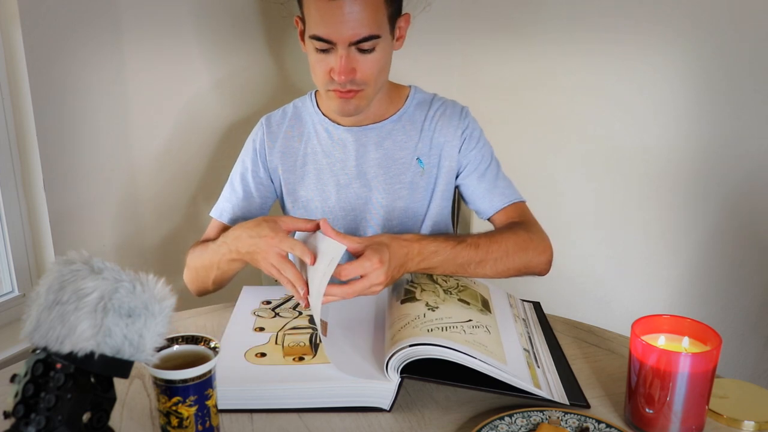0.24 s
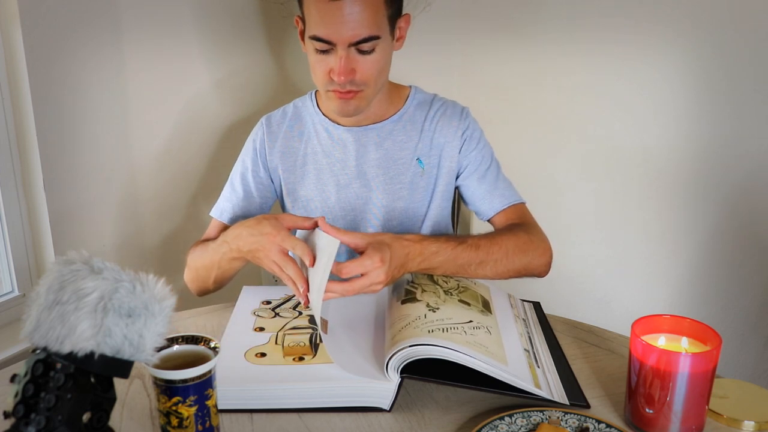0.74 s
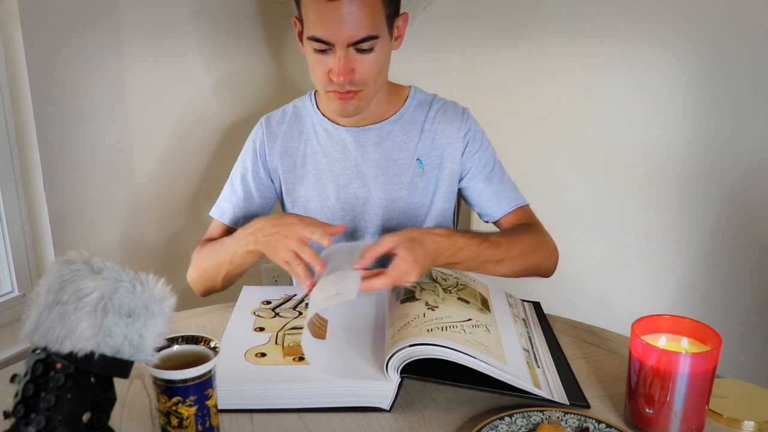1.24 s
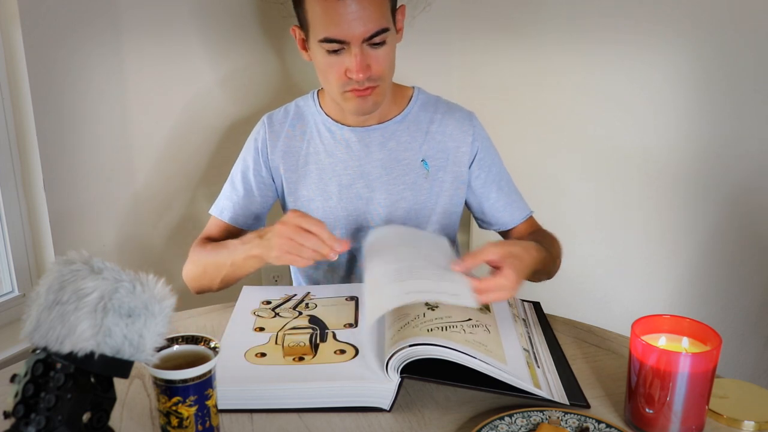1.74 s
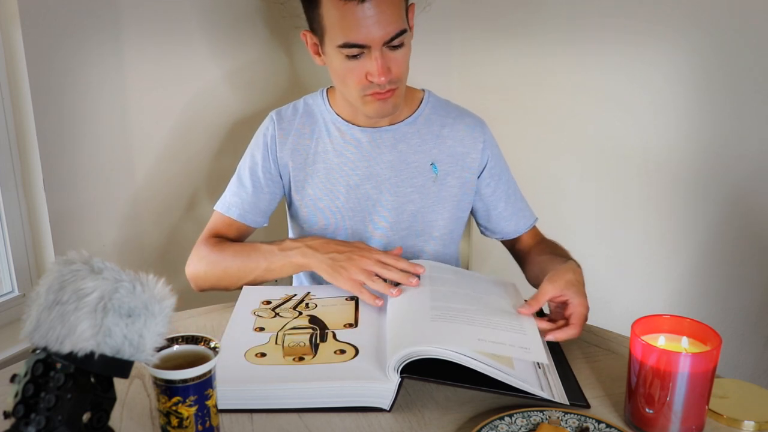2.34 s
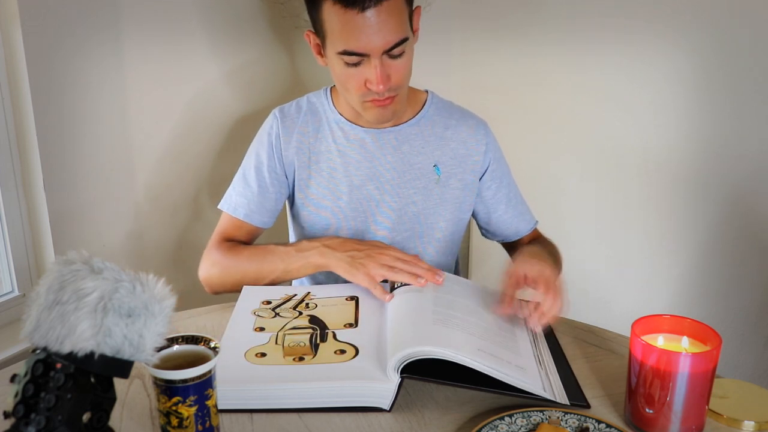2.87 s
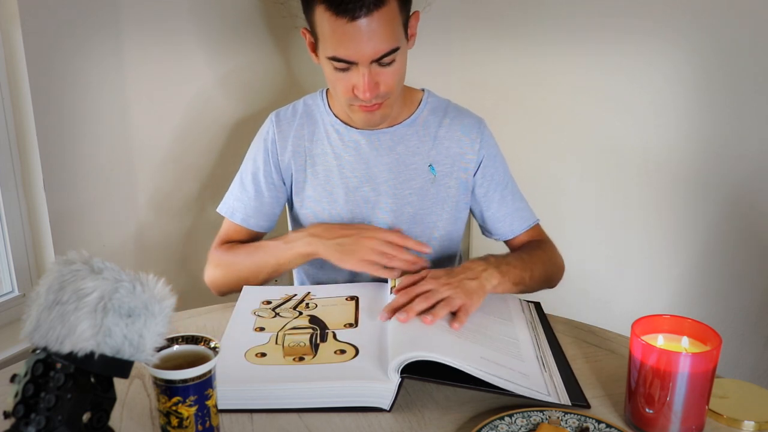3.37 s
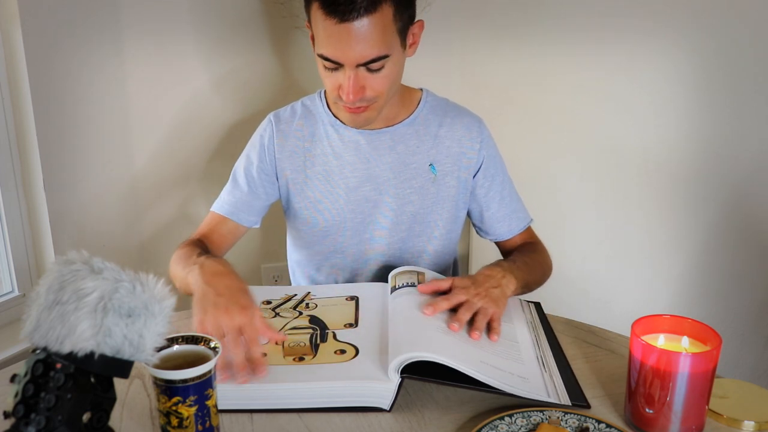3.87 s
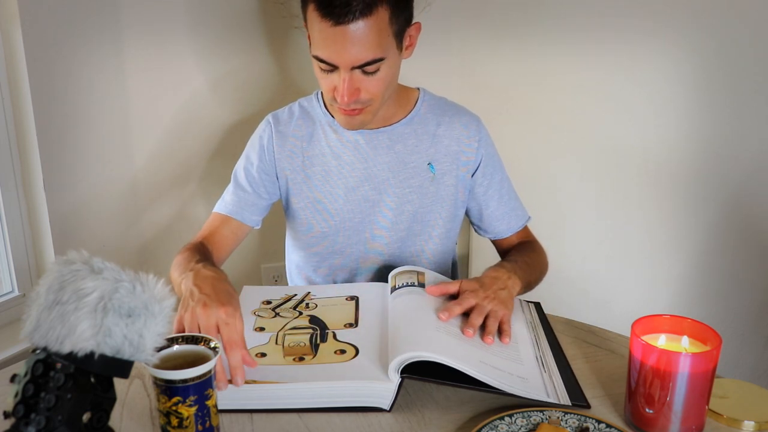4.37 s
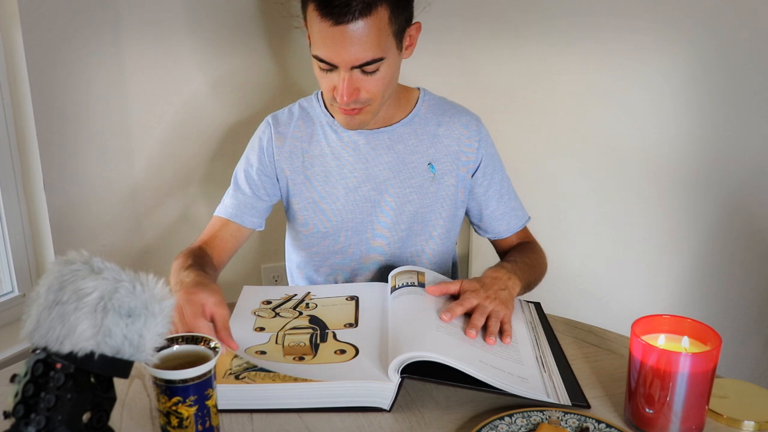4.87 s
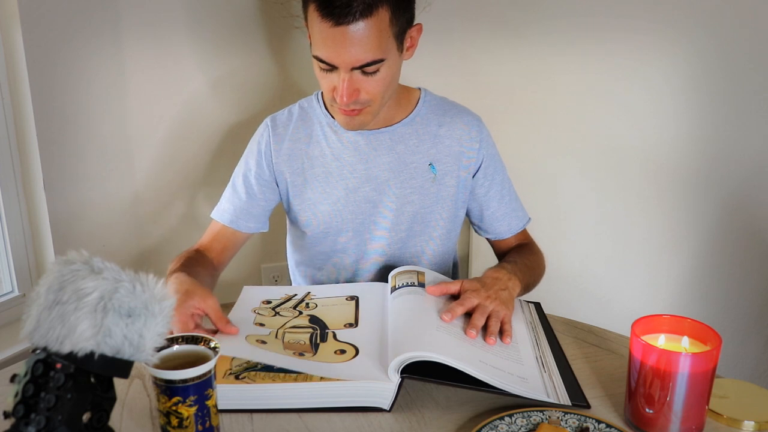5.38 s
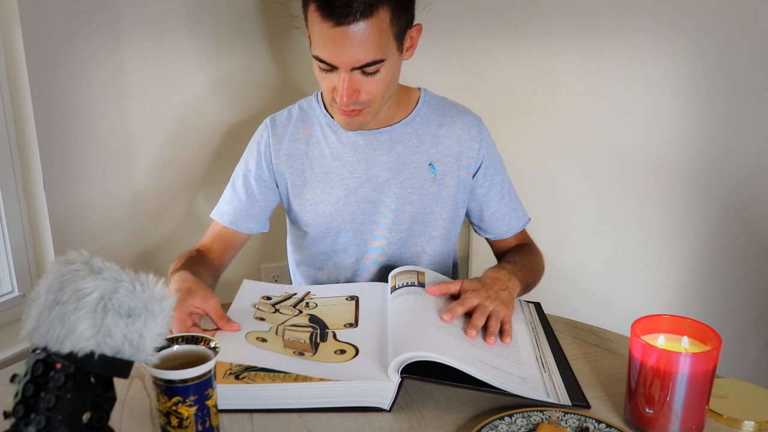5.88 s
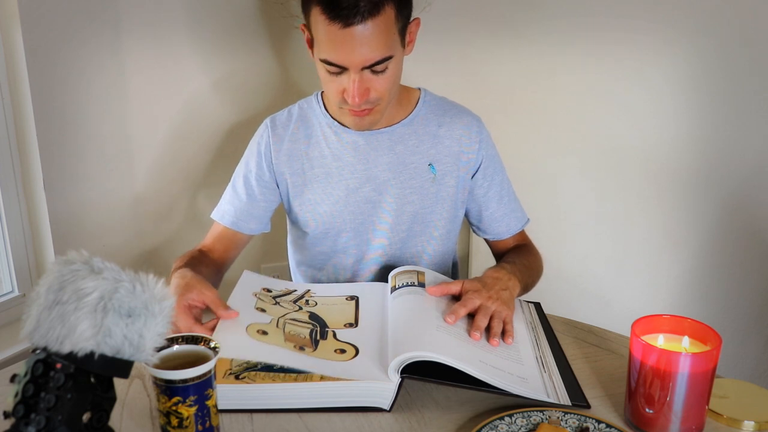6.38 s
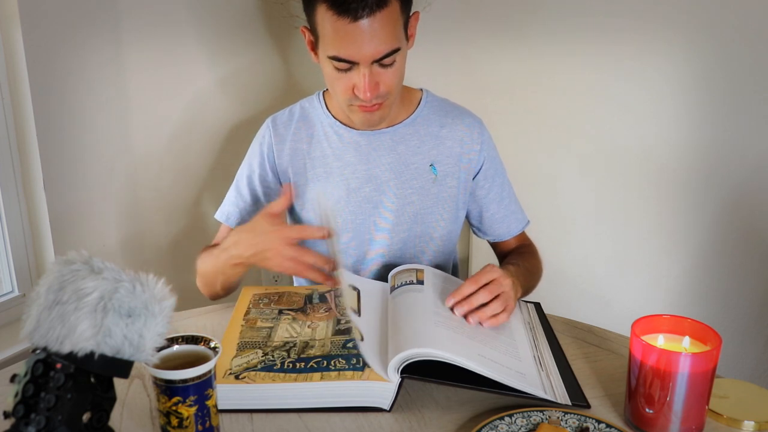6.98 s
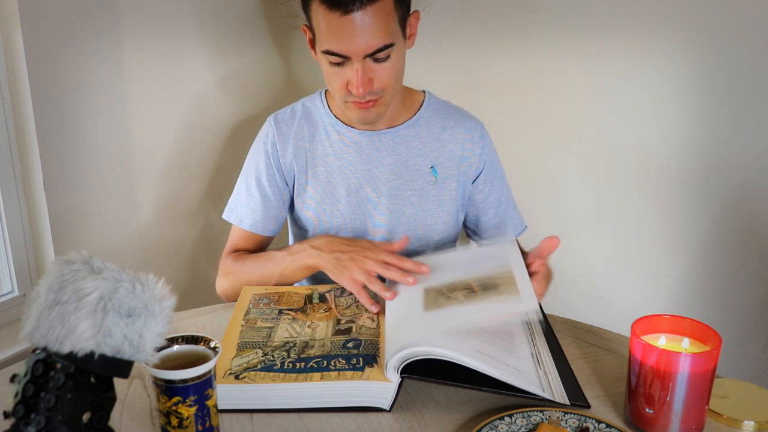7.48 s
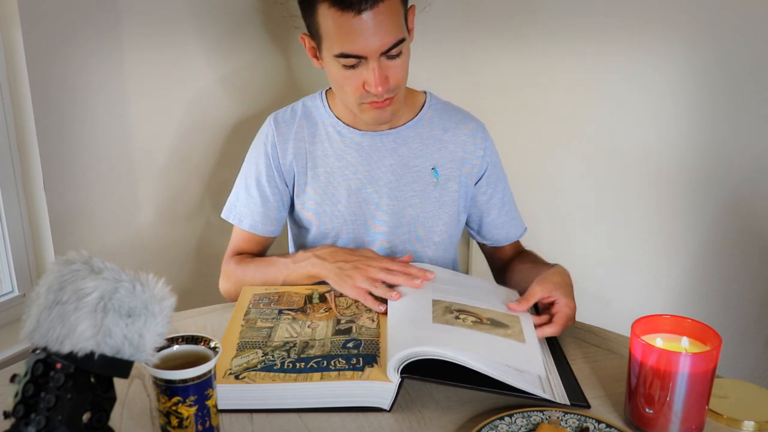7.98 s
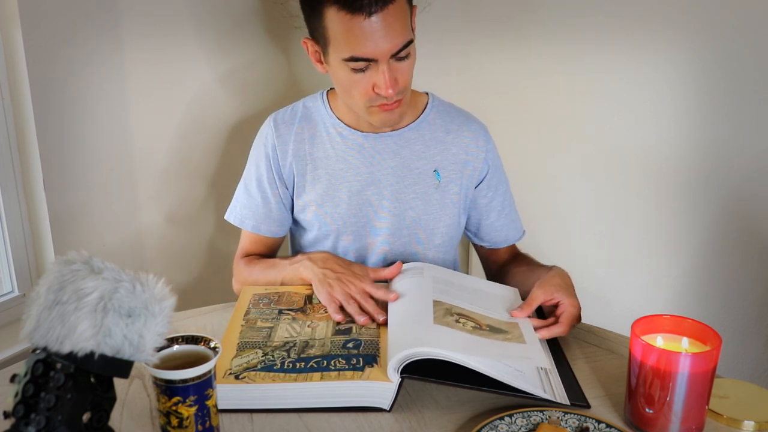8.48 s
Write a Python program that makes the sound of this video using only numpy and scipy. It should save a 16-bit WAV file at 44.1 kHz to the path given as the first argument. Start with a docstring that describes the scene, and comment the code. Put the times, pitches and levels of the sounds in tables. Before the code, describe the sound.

Close stereo sound of a large book with thick pages, handled at a wooden table in a quiet, fairly dry room with faint hiss. It opens with a sheet flexing and rustling; tiny ticks come around 0.4 s, a hard loud snap at 0.65 s and a weaker snap with a low papery puff at 1.1 s. The page turns over with hollow, airy rustling until about 2.4 s. From 2.7 to 4.3 s hands smooth the paper in soft bright hisses, with dull low table bumps, notably at 3.2 and 3.7 s. A sharp click with a short slap lands at 4.67 s, then silky sliding. Between 5.8 and 6.3 s a corner crackles in about eight dry clicks over a low table tremor. Another page sweeps over around 7 s, flops softly at 7.6 s, and light smoothing and low thumps, strongest near 8.4 s, finish at 8.7 s.

```python
"""Thick pages of a large book are lifted, turned and smoothed by hand on a wooden table, near a stereo microphone.
Filtered grainy noise makes the sheets flex and slide, the air wedge sing and the skin hiss, stroke by stroke.
Hands ring decaying table modes over a tremor of varying level. Corners snap with a crack, kick, pop and short
bright hiss; sheets slap as band-limited puffs. Weak echoes, a decaying diffuse part unlike in left and right,
and a quiet floor hiss surround them."""
import sys
import numpy as np
from scipy import signal
from scipy.fft import rfft, irfft, next_fast_len
from scipy.io import wavfile
from scipy.ndimage import uniform_filter1d, map_coordinates

SR = 44100
rng = np.random.default_rng(int(sys.argv[2]) if len(sys.argv) > 2 else 0)


def wav_out(sig):
    """Save sig, one row per channel (or a flat mono array), as 16-bit PCM at SR to the path in sys.argv[1]."""
    wavfile.write(sys.argv[1], SR, np.round(np.clip(np.atleast_2d(sig).T, -1, 1) * 32767).astype(np.int16))


N = 384552

# Every pan_db is left minus right.
# hand strokes: peak_s, rise_s, fall_s, flex_db, slide_db, skin_db, slide_centre_hz
STROKES = [(0.069, 0.67, 0.13, -45.5, -45.5, -57.5, 2330), (.364, 0.076, 0.041, -62.5, -59.5, -86, 2000),
           (.5, 0.02, 0.11, -56, -57.5, -80, 2200), (.6, 0.11, 0.056, -56, -58, -68, 1850),
           (.70, 0.057, 0.14, -49, -54.5, -67, 1750), (.84, 0.072, .08, -54.5, -54.5, -65, 2000),
           (.956, 0.13, 0.052, -48, -49, -60.5, 2430), (1.075, 0.021, 0.094, -54, -45.5, -52.5, 1930),
           (1.144, 0.1, 0.094, -46.5, -45, -56, 2300), (1.32, 0.14, 0.25, -56.5, -53, -53.5, 2740),
           (1.5, 0.24, 0.77, -57, -52, -55.5, 2050), (1.74, 0.24, 0.24, -59.5, -65, -57, 2200),
           (1.91, 0.27, 0.17, -55.5, -64, -53, 2320), (2.24, 0.33, 0.19, -58.5, -60, -55, 3090),
           (2.55, 0.85, 0.44, -76, -66, -60, 2600), (3.03, 0.44, 0.3, -74, -65.5, -55.5, 2940),
           (3.21, 0.17, 0.45, -87, -66, -52, 4200), (3.47, 0.048, 0.16, -71, -66, -69, 3600),
           (3.77, 0.44, 0.42, -74, -60.5, -47, 3950), (3.99, .25, 0.22, -71.5, -60, -50, 4430),
           (4.16, 0.18, 0.15, -74, -69.5, -57.5, 4000), (4.34, 0.071, 0.089, -73, -72, -64, 3000),
           (4.58, 0.086, 0.16, -78, -70, -59.5, 4500), (4.745, 0.14, 0.11, -64, -53, -56.5, 4200),
           (4.815, 0.077, 0.14, -59.5, -48, -53, 3880), (5.1, 0.37, 0.6, -66.5, -51.5, -52.5, 3970),
           (5.27, 0.31, 0.36, -74, -50.5, -46, 3870), (5.5, 0.27, 0.13, -71, -52, -51, 3780),
           (5.76, 0.35, 0.088, -68, -56.5, -61, 2980), (6.34, 0.093, 0.25, -57.5, -51.5, -60, 2400),
           (6.45, 0.067, 0.053, -72, -60, -69, 3200), (6.58, 0.1, 0.22, -68, -56.5, -65, 3700),
           (6.87, 0.53, 0.37, -62.5, -58.5, -52, 2460), (7.15, 0.24, 0.24, -61, -59.5, -52, 2200),
           (7.42, 0.7, 0.21, -67.5, -57, -51, 3120), (7.66, 0.069, 0.15, -55, -61, -56.5, 1600),
           (7.78, .1, .06, -60, -75, -58, 1600), (7.9, 0.046, .06, -61.5, -66.5, -66, 2280),
           (8.0, 0.065, 0.17, -68.5, -72, -62, 2400), (8.17, 0.33, 0.34, -68.5, -62.5, -53, 2560),
           (8.34, .12, 0.17, -65.5, -57.5, -48, 3300), (8.44, 0.13, 0.13, -67.5, -61.5, -52.5, 3380),
           (8.64, 0.14, 0.57, -69.5, -61, -54, 3270)]
# the hands: start_s, pan_db, base_hiss_tilt_db_per_octave
HAND_PATH = [(0, -2, 1.5), (.5, -2, -3), (1.07, -1.5, 2), (1.45, -2, -4), (1.9, -1.5, -4.5),
             (2.1, -2, -8.5), (2.5, -1, -2.5), (2.9, -2.5, -1.5), (3.3, -2.5, 2), (4, -2, 2), (4.3, -2, 0),
             (4.46, -1, -4), (4.58, -1, -2), (4.72, -3, -10), (4.85, -1, 1), (5.2, -.5, 4.5), (5.6, .3, 0),
             (6.2, .3, -3), (6.75, .5, 4.5), (7.1, -2, -0.5), (7.5, -2.5, -0.5), (7.8, -2.5, -6),
             (8.28, -2, 2), (8.72, -2.5, 2)]
# air wedge under a lifted sheet: start_s, pitch_hz, level_db
AIR_WEDGE = [(0, 925, -50.5), (.12, 950, -52), (.25, 900, -72), (1.25, 795, -59), (1.4, 766, -70),
             (1.45, 764, -52.5), (1.65, 770, -55.5), (1.8, 814, -51.5), (2.0, 789, -63.5), (2.3, 1240, -68),
             (2.42, 1610, -69), (2.65, 1570, -71), (2.8, 1630, -81), (4.6, 1310, -86), (4.75, 1190, -66),
             (5.05, 2180, -80), (5.55, 1650, -60.5), (6.0, 1500, -79), (6.35, 1500, -64),
             (6.75, 1260, -69.5), (7.15, 1920, -61.5), (7.9, 1490, -73), (8.15, 1680, -66.5),
             (8.72, 1560, -79)]
# sheet flexing modes: centre_hz, width_hz, relative_db
FLEX_MODES = [(183.4, 57, -2.5), (262.3, 62, -4), (419, 43, -4.5), (598, 39, -2), (718, 188, -2.5),
              (827, 130, 1.5), (1070, 146, -4), (1305, 154, 0.5), (1697, 376, -5.5)]
# paper sliding modes: centre_hz, width_hz, relative_db
SLIDE_MODES = [(1405, 650, -18), (2040, 570, 2.5), (2890, 620, 2), (3945, 960, 3), (5340, 760, -3)]
# skin hiss spectrum, also used for the snaps' hiss: freq_hz, relative_density_db
SKIN_SPECTRUM = [(1500, -45), (3500, -4.5), (5500, -3.5), (7800, 0), (10000, -2.5), (12500, -5),
                 (15800, -9)]
# table tremor: start_s, level_db
TREMOR = [(0, -46), (.2, -70), (1.9, -70.5), (2.3, -60.5), (3.2, -66), (3.74, -55), (4.03, -64.5),
          (4.6, -55.5), (5.0, -61), (5.68, -65), (5.9, -45), (6.3, -39), (6.5, -50.5), (7.04, -59.5),
          (7.7, -53), (8.72, -59.5)]
# hands pushing the table: start_s, low_modes_db, upper_modes_db, rise_s, pan_db
THUMPS = [(0.076, -44, -55, .01, 7.5), (0.932, -45.5, -45, .019, 9.5), (1.089, -37, -52, 0.01, 7),
          (2.195, -51, -65, .03, -17), (2.736, -43, -38, 0.018, -12), (3.11, -59, -40, .02, -8),
          (3.179, -29.5, -41, 0.044, -13), (3.539, -44.5, -60, 0.041, -15), (3.694, -34, -30, 0.044, -23),
          (4.163, -49.5, -47, .02, -10), (4.332, -42, -44, 0.016, -11), (4.645, -47, -38, .02, -2),
          (5.406, -44, -66, 0.022, 8), (5.582, -58, -48, 0.023, 2), (6.029, -58, -33, 0.018, -6),
          (6.389, -38, -63, 0.013, -6), (6.704, -41.5, -47, 0.0095, -6.5), (6.984, -49, -60, .02, -1),
          (7.24, -47, -43.5, .014, -4), (7.602, -39, -35, 0.017, 7), (7.72, -36.5, -37, 0.021, -12),
          (8.078, -42, -64, 0.016, 5.5), (8.189, -46, -62, .017, 6), (8.315, -36, -36.5, .019, -5),
          (8.38, -28, -40, 0.026, -13), (8.528, -34.5, -47, 0.01, -8.5)]
# table modes: nominal_hz, relative_db, t60_s
TABLE_MODES = [(35, -0.5, 0.26), (62.6, 7, 0.26), (115.7, 0.5, 0.26), (165, -10.5, 0.13)]
# room air and microphone hiss spectrum: freq_hz, relative_density_db
FLOOR_SPECTRUM = [(15, -10.5), (25, 3.5), (86, -21.5), (414, -25), (812, -31), (955, -35), (1040, -30.5),
                  (1150, -32), (1280, -34.5), (15800, -47)]
# corners snapping free: start_s, level_db, upper_crack_relative_db, pop_relative_db, hiss_relative_db, pan_db
SNAPS = [(0.3672, -50, -20, 2.5, -28, -2), (0.4345, -48.5, -35, -7, -29, -5), (0.488, -53, -21, 1, -32, -4),
         (0.6453, -18, -12, -5, -21.5, -7), (1.053, -41.5, -19, 5.5, -22, -1.5),
         (1.1033, -24.5, -8, 0, -8.5, -1), (4.5515, -50.5, -22, 1, -14, -1),
         (4.6696, -32, 8, -5.5, -18, -2.5), (5.8282, -40, -5, -5, -0.5, 2.5),
         (5.898, -30.5, -10, -11.5, -8.5, 1), (5.9745, -31.5, -8, -9, -9, 0),
         (6.096, -31.5, -12, -4, -6, 0), (6.1585, -30, -13, -14, -10, 2),
         (6.2046, -30.5, -13, -11.5, -8, 1), (6.2659, -27.5, -16, -13.5, -11.5, 1),
         (6.307, -31.5, -12, -7.5, -11, 3), (7.6238, -43, -15, 13, 1, -5)]
# stiff page edge modes: centre_hz, width_hz, relative_db
EDGE_MODES = [(700, 220, -1), (1680, 235, 5.5), (3630, 1060, 12.5), (4580, 750, 5), (8360, 1900, -24)]
# sheets slapping, buckling or brushing: start_s, level_db, low_corner_hz, high_corner_hz, rise_s, t60_s, pan_db
SLAPS = [(0.647, -29, 500, 1980, 0.0023, 0.049, 13), (.935, -34, 186, 1350, 0.0091, 0.12, -1),
         (1.057, -52, 500, 5000, .015, .15, -3), (1.105, -32.5, 120, 695, 0.003, 0.16, -2),
         (1.146, -44, 1000, 8000, 0.002, 0.14, -1), (1.745, -50, 150, 500, 0.0065, 0.1, 6),
         (2.717, -44.5, 120, 1010, 0.0095, 0.18, -3), (3.02, -44, 1200, 5000, .015, 0.09, -9),
         (3.665, -54, 700, 2200, .01, .1, -3), (4.32, -57, 650, 920, .015, 0.16, -2),
         (4.668, -26, 110, 710, 0.00036, 0.032, 0), (4.80, -51, 400, 900, 0.0075, .15, 0),
         (7.623, -43, 900, 2600, 0.0044, 0.14, 0), (7.628, -30, 420, 900, 0.0063, 0.3, -2.5),
         (7.645, -34, 400, 990, 0.0038, 0.27, 0), (7.719, -47, 200, 940, 0.024, 0.7, -1),
         (8.33, -49.5, 298, 875, .02, 0.19, -7)]
# phase lead of the right capsule: freq_hz, lead_rad
CAPSULE_LEAD = [(60, 2.6), (170, 0.82), (1000, 0.91), (4000, 1.05), (6000, 1.42), (8000, 2.6), (12000, 4.4),
                (16000, 4.8)]
# early echoes: delay_s, level_db
WALL_ECHOES = [(.0042, -25), (.013, -11.5), (.021, -35), (0.027, -18.5)]
# decay of the diffuse part: freq_hz, t60_s
DIFFUSE_DECAY = [(200, 0.17), (1400, 0.45), (4000, 0.043), (12000, 0.11)]
# level of the diffuse part, unlike in left and right, against the direct sound: freq_hz, level_db
DIFFUSE_LEVEL = [(100, 1), (1000, -12), (3000, -11), (6000, -1), (9000, -2), (15000, -6)]

EDGE_DB, ROUNDNESS = 17, 1.373  # stroke drop one rise before or one fall after the peak; power of the bend
REST_DB = (-88, -76, -92)  # hands lying still: flex, slide, skin
RUSTLE_DELAY_S, RUSTLE_RISE_S, RUSTLE_FALL_S = 0.006, 0.021, 0.084
RUSTLE_DB, RUSTLE_HZ = (-17, -17, -19), 2500  # flex, slide, skin added to snap level + hiss; slide centre
TILT_GROWTH = 0.35  # dB per octave, per dB of skin hiss over slide
RECOIL_DB = (-48, -40.5)  # low and upper table modes after a middling snap
RECOIL_GROWTH, MIDDLING_DB = 0.73, -33  # dB of jolt per dB of snap; middling snap level
RECOIL_RISE_S, RECOIL_EARLY_S = 0.016, 0.0102
RECOIL_PAN_DB, RECOIL_LEAN = 1, -1  # offset; dB per dB of snap pan
POP_T60_S = 0.033
FLOOR_DB, TOP_HZ = -57.5, 15820


def amp(db):
    """Decibels to gain."""
    return 10 ** (np.asarray(db) / 20)


def unit(x):
    """Scaled to rms 1."""
    return x / np.sqrt(np.mean(x ** 2) + 1e-20)


def along(points, hz):
    """Interpolates (Hz, value) points on a log-frequency axis."""
    point_hz, values = np.transpose(points)
    return np.interp(np.log(hz + 1), np.log(point_hz + 1), values)


def curves(rows):
    """One value per sample for each column after the time."""
    times_s, *columns = np.transpose(rows)
    return [np.interp(np.arange(N) / SR, times_s, column) for column in columns]


def wobble(rate):
    """A smooth random curve, rate knots a second."""
    knots = rng.standard_normal(int(N * rate / SR) + 4)
    return map_coordinates(knots, [np.arange(N) * rate / SR])


def filtered(x, response):
    """x times a complex response of frequency."""
    size = next_fast_len(x.shape[-1] + SR // 2)
    spectrum = rfft(x, size) * response(np.fft.rfftfreq(size, 1 / SR))
    return irfft(spectrum, size)[..., :x.shape[-1]]


def resonances(modes):
    """Parallel band-pass response of (Hz, width Hz, dB) modes with alternating signs."""
    def response(hz):
        return sum((-1) ** k * amp(db) * 1j * hz * width / (centre * centre - hz * hz + 1j * hz * width)
                   for k, (centre, width, db) in enumerate(modes))
    return response


def bump(hz, centre_hz, octaves):
    """A bell of height 1 on a log-frequency axis."""
    return np.exp(-.5 * (np.log2((hz + 1) / centre_hz) / octaves) ** 2)


def panned(x, pan_db):
    """A mono sound shared between left and right."""
    return x * amp(np.array([[.5], [-.5]]) * pan_db)


def add(track, start_s, sound):
    """Mixes a short sound into the track."""
    part = track[..., round(start_s * SR):][..., :sound.shape[-1]]
    part += sound[..., :part.shape[-1]]


def strokes():
    """Strokes and post-snap rustles swell and fade; powers add, and slide power weights the centre pitch."""
    rustles = []
    for start_s, db, _, _, hiss_db, _ in SNAPS:
        levels_db = db + hiss_db + np.array(RUSTLE_DB)
        rustles.append((start_s + RUSTLE_DELAY_S, RUSTLE_RISE_S, RUSTLE_FALL_S, *levels_db, RUSTLE_HZ))
    peak_s, rise_s, fall_s, *levels_db, centre_hz = np.transpose(list(STROKES) + rustles)[..., None]
    t = np.arange(0, N / SR + .002, .001)
    away = np.where(t < peak_s, (peak_s - t) / rise_s, (t - peak_s) / fall_s)
    powers = [amp(db - EDGE_DB * away ** ROUNDNESS) ** 2 for db in levels_db]
    sums_db = [10 * np.log10(p.sum(0) + amp(db) ** 2) for p, db in zip(powers, REST_DB)]
    weight = powers[1] + 1e-30
    slide_hz = (weight * centre_hz).sum(0) / weight.sum(0)
    return curves(np.transpose([t, *sums_db, slide_hz]))


def friction(colour, grain_db, grain_rate, patchy_db):
    """Fibres catch in grains of uneven size; noise takes a moving colour and swells in patches."""
    grains = rng.standard_normal(N) * amp(grain_db * wobble(grain_rate))
    hz, t, z = signal.stft(grains, SR, nperseg=512)
    field = uniform_filter1d(rng.standard_normal(z.shape), 6, 0)
    field = uniform_filter1d(field, 14, 1)
    gain = colour(hz[:, None], np.minimum(t * SR, N - 1).astype(int))
    gain = gain / np.linalg.norm(gain, axis=0) * amp(patchy_db * unit(field))
    return unit(signal.istft(z * gain, nperseg=512)[1][:N])


def rubbing():
    """The sheet flexes over a hollow of air, slides on its neighbour and hisses under the skin."""
    flex_db, slide_db, skin_db, slide_hz = strokes()
    pan_db, tilt_db = curves(HAND_PATH)
    tilt_db = np.clip(tilt_db + TILT_GROWTH * (skin_db - slide_db), -12, 8)
    wedge_hz, wedge_db = curves(AIR_WEDGE)

    def flex_colour(hz, at):
        return resonances(FLEX_MODES)(hz)

    def wedge_colour(hz, at):
        return bump(hz, wedge_hz[at], 0.22)

    def slide_colour(hz, at):
        return resonances(SLIDE_MODES)(hz) * amp(13.5 * bump(hz, slide_hz[at], 0.79))

    def skin_colour(hz, at):
        octaves = np.log2(np.maximum(hz, 5000) / 9000)  # tilt acts above 5 kHz
        return amp(along(SKIN_SPECTRUM, hz) + tilt_db[at] * octaves)

    flex = amp(flex_db) * friction(flex_colour, grain_db=3.0, grain_rate=180, patchy_db=1.5)
    wedge = amp(wedge_db) * friction(wedge_colour, grain_db=1.2, grain_rate=120, patchy_db=.8)
    slide = amp(slide_db) * friction(slide_colour, grain_db=1.5, grain_rate=200, patchy_db=2.0)
    skin = amp(skin_db) * friction(skin_colour, grain_db=0.5, grain_rate=400, patchy_db=0.0)
    return panned(flex + wedge + slide + skin, pan_db)


def table():
    """Pushes and snap recoils ring modes over a tremor; each ring is detuned a little at random."""
    ring, t = np.zeros((2, N)), np.arange(SR // 2) / SR
    recoils = []
    for start_s, db, *_, pan_db in SNAPS:
        jolt_db = RECOIL_GROWTH * (db - MIDDLING_DB) + np.array(RECOIL_DB)
        recoil_pan_db = RECOIL_PAN_DB + RECOIL_LEAN * pan_db  # the stand rocks away from the side of the snap
        recoils.append((start_s - RECOIL_EARLY_S, *jolt_db, RECOIL_RISE_S, recoil_pan_db))
    pushes = list(THUMPS) + recoils
    chance = rng.standard_normal((len(pushes), 2, len(TABLE_MODES)))
    for (start_s, low_db, upper_db, rise_s, pan_db), (phases, detunes) in zip(pushes, chance):
        modes = []
        for (hz, db, t60_s), phase, detune in zip(TABLE_MODES, phases, detunes):
            detuned_hz = hz * (1 + 0.042 * detune)
            modes.append(amp(db - 60 * t / t60_s) * np.sin(2 * np.pi * detuned_hz * t + phase))
        rocking = panned(amp(low_db) * sum(modes[:2]), pan_db)  # the stand rocks towards one capsule
        bending = panned(amp(upper_db) * sum(modes[2:]), 0.22 * pan_db)
        add(ring, start_s, (rocking + bending) * (1 - np.exp(-t / rise_s)) ** 2)
    body = resonances([(hz, 18, db) for hz, db, _ in TABLE_MODES])
    tremor = amp(curves(TREMOR)[0]) * unit(filtered(rng.standard_normal((2, N)), body))
    return ring + tremor * amp([[-1.5], [1.5]])


def floor_hiss():
    """Room air and microphone hiss: steady coloured noise, independent in each channel."""
    noise = rng.standard_normal((2, N))
    return amp(FLOOR_DB) * unit(filtered(noise, lambda hz: amp(along(FLOOR_SPECTRUM, hz))))


def snaps():
    """A released corner gives a crack and kick of its edge, a low sheet pop and a short burst of bright hiss."""
    out, t = np.zeros((2, N)), np.arange(SR // 10) / SR
    u = np.maximum(t - .0002, 0) / .00022
    kick = np.e * u * np.exp(-u) * (1 - 0.15 * u)  # the edge throws one short push of air
    chance = rng.standard_normal((len(SNAPS), 3, len(t)))
    for row, (crack_noise, pop_noise, hiss_noise) in zip(SNAPS, chance):
        start_s, db, upper_db, pop_db, hiss_db, pan_db = row
        edge = [(hz, width, level + (upper_db if hz > 2500 else 0)) for hz, width, level in EDGE_MODES]
        crack = filtered(crack_noise * amp(-60 * t / .0035), resonances(edge))
        pop = filtered(pop_noise * amp(-60 * t / POP_T60_S),
                       lambda hz: resonances(FLEX_MODES)(hz) / (1 + 1j * hz / 900))
        hiss_decay = amp(-60 * t / 0.0024) + 0.56 * amp(-60 * t / 0.043)
        hiss = filtered(hiss_noise * hiss_decay, lambda hz: amp(along(SKIN_SPECTRUM, hz)))
        layers = ((2.5, crack), (pop_db + 0.5, kick), (pop_db + 0.5, pop), (hiss_db + 4.5, hiss))
        snap = sum(amp(level) * part / np.abs(part).max() for level, part in layers)
        add(out, start_s, panned(amp(db) * snap, pan_db))
    return out


def slaps():
    """Air squeezed from under a broad sheet: a puff coloured by the sheet's resonances."""
    out, t = np.zeros((2, N)), np.arange(SR // 3) / SR
    chance = rng.standard_normal((len(SLAPS), len(t)))
    for (start_s, db, low_hz, high_hz, rise_s, t60_s, pan_db), noise in zip(SLAPS, chance):
        def response(hz):
            high_pass = (1j * hz / (low_hz + 1j * hz)) ** 2
            low_pass = 1 / (1 + 1.4j * hz / high_hz - (hz / high_hz) ** 2) ** 2
            return (0.39 + resonances(FLEX_MODES)(hz)) * high_pass * low_pass

        puff = unit(filtered(noise, response))
        envelope = amp(db - 60 * t / t60_s) * (1 - np.exp(-t / rise_s))
        add(out, start_s, panned(envelope * puff, pan_db))
    return out


def walls(x):
    """The table top and the nearest walls return weak, duller copies."""
    def response(hz):
        echoes = sum(amp(db) * np.exp(-2j * np.pi * hz * delay_s) for delay_s, db in WALL_ECHOES)
        return echoes / (1 + 1j * hz / 4000)
    return filtered(x, response)


def capsules(x):
    """Two angled capsules hear a near source with a phase step that varies with frequency."""
    sides = np.array([[-1], [1]])
    return filtered(x, lambda hz: np.exp(.5j * along(CAPSULE_LEAD, hz) * sides))


def diffuse(x):
    """Energy gathers and dies at each frequency's own speed, carried by unlike noise in the two channels."""
    frames = dict(nperseg=256, noverlap=192)
    delayed = np.pad(x.mean(0), (200, 0))[:N]
    hz, t, z = signal.stft(delayed, SR, **frames)
    keep = amp(-120 * t[1] / along(DIFFUSE_DECAY, hz))  # 60 dB of energy per t60
    energy = np.array([signal.lfilter([1 - k], [1, -k], np.abs(row) ** 2) for k, row in zip(keep, z)])
    noise = signal.stft(rng.standard_normal((2, N)), SR, **frames)[2]
    gain = np.sqrt(energy / np.mean(np.abs(noise) ** 2)) * amp(along(DIFFUSE_LEVEL, hz))[:, None]
    return signal.istft(noise * gain, SR, **frames)[1][:, :N]


def scene():
    """Paper with echoes and a diffuse part, table without either, over a quiet floor."""
    paper = rubbing() + snaps() + slaps()
    direct = capsules(paper + walls(paper) + table())
    return direct + diffuse(paper) + floor_hiss()


def record(dry):
    """Keeps nothing above the band limit."""
    return filtered(dry, lambda hz: hz < TOP_HZ)


dry = scene()
out = record(dry)
wav_out(out)
```